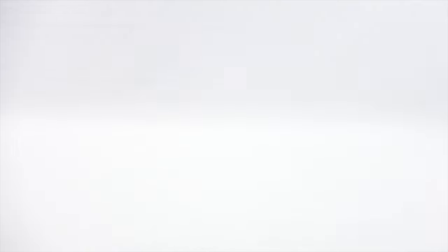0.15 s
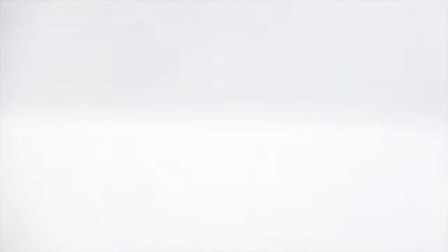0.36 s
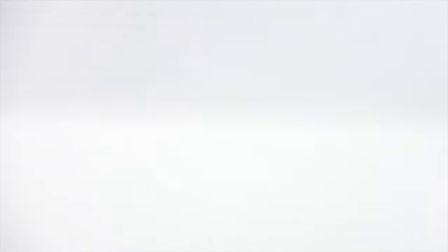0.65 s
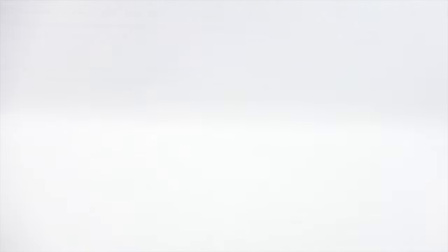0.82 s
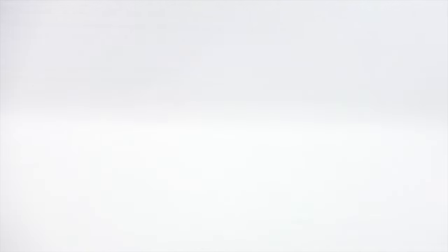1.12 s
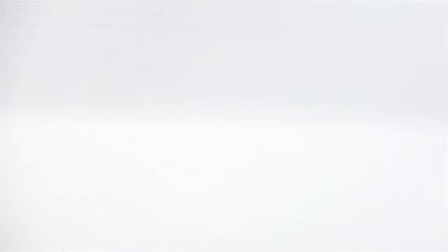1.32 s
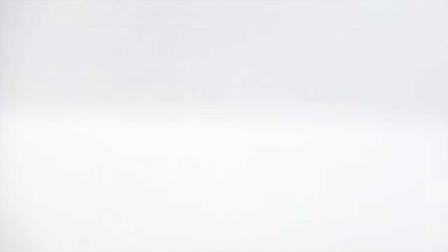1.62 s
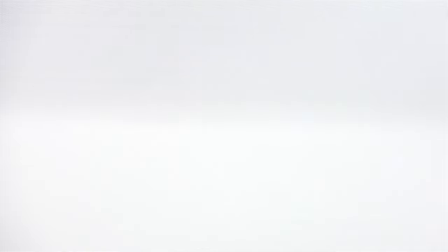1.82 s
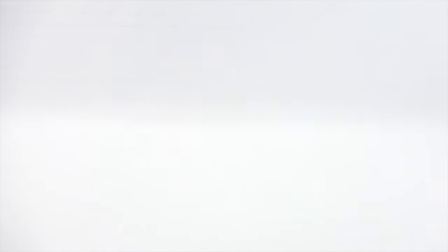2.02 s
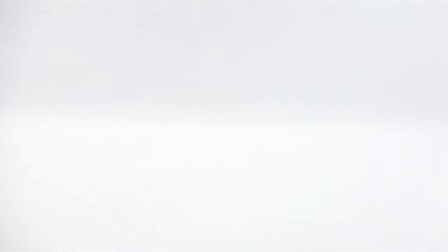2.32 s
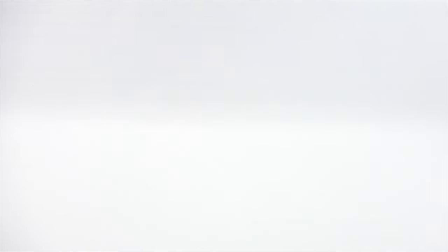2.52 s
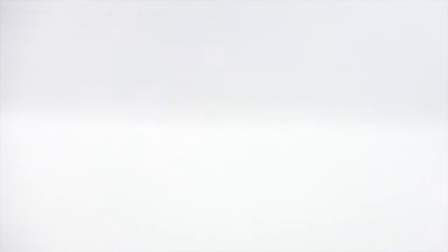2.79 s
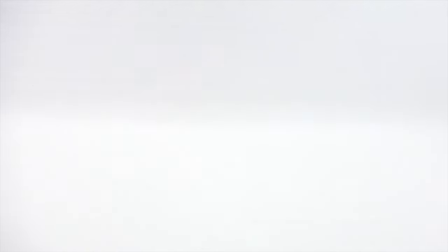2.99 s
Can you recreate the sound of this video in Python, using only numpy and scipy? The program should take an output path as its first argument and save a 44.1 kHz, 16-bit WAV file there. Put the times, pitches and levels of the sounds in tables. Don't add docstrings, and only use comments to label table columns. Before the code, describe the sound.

Steady rattling whir of a toy bird's motor and gears, briefly dipping at many wing beats, with soft low air puffs between slaps; close stereo pickup indoors, the toy drifting from near centre to the right.

```python
import sys
import numpy as np
from scipy import signal
from scipy.fft import rfft, irfft
from scipy.io import wavfile

SR = 44100
rng = np.random.default_rng(int(sys.argv[2]) if len(sys.argv) > 2 else 0)


def file_out(sig):
    cols = np.atleast_2d(sig).T
    lim = np.clip(cols, -1, 1)
    pcm = np.round(lim * 32767).astype(np.int16)
    wavfile.write(sys.argv[1], SR, pcm)


def elevation(decibels):
    levels = np.asarray(decibels, float)
    return 10 ** (levels / 20)


N = 138915
T = np.arange(N) / SR
CRANK_S, CRANK_START_S = 0.1873, 0.066
SUB_HZ, SUB_S, SUB_DB = 44, 0.0078, -9.5


def rms_one(x):
    return x / np.sqrt(np.mean(x ** 2) + 1e-20)


def at_hz(points, hz):
    table = np.array(points)
    return np.interp(np.log(hz), np.log(table[:, 0]), table[:, 1])


def drift(rate_hz):
    r = np.exp(-40 * np.pi * rate_hz / SR)
    slow = signal.lfilter([1], [1, -2 * r, r * r], rng.standard_normal(N // 20 + 2002))[2000:]
    return np.interp(np.arange(N) / 20, np.arange(len(slow)), rms_one(slow))


def bump(s, before_s, after_s):
    d = T - s
    width = np.where(d < 0, abs(before_s) + 1e-4, abs(after_s) + 1e-4)
    return np.exp(-0.5 * (d / width) ** 2)


def push(s, hz, width_s, phase):
    return bump(s, width_s, width_s * 1.31) * np.cos(2 * np.pi * hz * (T - s) + phase)


def sides(pan_db):
    return elevation(np.array([pan_db / 2, -pan_db / 2]))


def spread(mid, side, alike):
    return np.sqrt(1 + alike) * mid + np.sqrt(1 - alike) * side * [[1], [-1]]


def split(low_hz, top_hz, count):
    centres = np.geomspace(low_hz, top_hz, count)
    log_hz = np.log(np.fft.rfftfreq(N, 1 / SR) + 1)
    return [(c, np.interp(log_hz, np.log(centres), np.arange(count) == k)) for k, c in enumerate(centres)]


# share of turn, level/dB
LOAD_CYCLE = [
    (0, -2.5),
    (.1, -1),
    (.3, -1),
    (.48, -0.15),
    (.8, -0.3),
    (.95, -0.28),
    (1, -2.5),
]


def crank_load():
    return np.interp((T - CRANK_START_S) / CRANK_S % 1, *np.transpose(LOAD_CYCLE))


def rotation():
    motor_hz = 158 * (1 + 0.0278 * drift(5.28))
    wheel_db = 0.6 * np.cos(2 * np.pi * 28.5 * T)
    return wheel_db + 2 * np.cos(2 * np.pi * np.cumsum(motor_hz) / SR)


def jolts():
    jolts_per_s, decay_s = 170, 0.004
    starts = rng.exponential(1, N) * (rng.random(N) < jolts_per_s / SR)
    level = np.log(1 + signal.lfilter([1], [1, -np.exp(-1 / (decay_s * SR))], starts))
    return (level - level.mean()) / level.std()


# t/s, peak level/dB, decay/s
RATTLE_FITS = [(0.0388, -11, 0.0044), (0.1396, -18, 0.004), (0.161, -15, 0.0037), (0.169, -7, 0.0042),
               (0.2249, -12, 0.004), (0.27, -8, 0.004), (0.3047, -10, 0.0047), (0.311, -3, 0.0026),
               (0.3301, -12, 0.0032), (0.39, -5, 0.004), (0.4244, -13, 0.004), (0.4324, -8, 0.004),
               (0.473, -5, 0.0031), (0.4948, -9, 0.0037), (0.572, -9, 0.004), (0.644, -9, 0.0031),
               (0.6719, -7, 0.0047), (0.679, -14, 0.003), (0.7046, -9, 0.0043), (0.7437, -18, 0.0029),
               (0.8847, -16, 0.004), (0.9143, -20, 0.0033), (1.043, -7, 0.0047), (1.0774, -11, 0.004),
               (1.2092, -15, 0.004), (1.342, -8, 0.003), (1.3894, -8, 0.0032), (1.4127, -7, 0.004),
               (1.4491, -11, 0.0028), (1.515, -12, 0.004), (1.5429, -11, 0.0036), (1.6207, -15, 0.003),
               (1.6565, -11.5, 0.0028), (1.76, -2, 0.0046), (1.793, -9, 0.012), (1.912, -8, 0.004),
               (1.922, -12, 0.0034), (1.9619, -6, 0.0036), (1.993, -9, 0.004), (2.0168, -13, 0.004),
               (2.108, -12, 0.0045), (2.1914, -13, 0.0032), (2.2897, -10.5, 0.0032), (2.3291, -18, 0.0032),
               (2.3544, -6, 0.0047), (2.3644, 2, 0.003), (2.567, -7.5, 0.0051), (2.7, -7, 0.0034),
               (2.723, -6, 0.0036), (2.758, -9, 0.0043), (2.8215, -15, 0.004), (2.93, -4, 0.0032),
               (2.9642, -11, 0.0025), (3.0284, -9, 0.0028), (3.1043, -6, 0.0037), (3.1173, -8, 0.0043)]


def rattle_fits():
    return sum((db + 15) * bump(s + 0.00053, 0.0002, decay_s) for s, db, decay_s in RATTLE_FITS)


# t/s, level over the chatter/dB
TOOTH_KNOCKS = [(0.0647, 23), (0.104, 9), (0.1392, 20), (0.341, 7), (0.474, 18), (0.497, 6), (0.5725, 15),
                (0.647, 11), (0.809, 20), (0.886, 11), (0.979, 7), (1.056, 11), (1.087, 16), (1.171, 11),
                (1.1814, 9),  (1.428, 23), (1.546, 2), (1.626, 10), (1.724, 22), (1.924, 4), (2.018, 12),
                (2.03, 14), (2.12, 22), (2.193, 8), (2.228, 16), (2.292, 5), (2.6, 18), (2.663, 19),
                (2.866, 14), (2.936, 15), (2.941, 2), (2.973, 11), (3.004, 12), (3.032, 7), (3.038, 13),
                (3.12, 20)]


def knocks():
    knock_s = 0.0011
    return 0.45 * sum(db * bump(s, knock_s * 0.28, knock_s) for s, db in TOOTH_KNOCKS)


def mesh():
    teeth_per_s, size_spread_db, hiss_share, knock_size = 4500, 3.5, 0.48, 6.6
    sizes = elevation(size_spread_db * np.minimum(rng.exponential(1, N), 2.6)) * rng.choice([-1, 1], N)
    teeth = rms_one(sizes * (rng.random(N) < teeth_per_s / SR))
    places = [int(s * SR) for s, db in TOOTH_KNOCKS]
    teeth[places] = knock_size * rng.choice([-1, 1], len(places))
    shared = np.sqrt(1 - hiss_share) * teeth + np.sqrt(hiss_share) * rng.standard_normal(N)
    return np.array([shared, rng.standard_normal(N)])


# t/s, depth/dB, fall/s, rise/s
BACKLASH_LULLS = [(0.124, -12.5, 0.017, 0.044), (0.293, -10.5, 0.014, 0.0059), (0.495, -24, 0.017, 0.002),
                  (0.585, -18.5, 0.015, 0.0091), (0.667, -51, 0.0087, 0.0036), (0.821, -7.5, 0.0028, 0.027),
                  (0.859, -13, 0.0029, 0.0043), (1.033, -12, 0.02, 0.038), (1.385, -3.5, 0.042, 0.0018),
                  (1.439, -15, 0.0076, 0.0048), (1.566, -3, 0.0056, 0.023), (1.611, -14, 0.0061, 0.005),
                  (1.786, -48, 0.0067, 0.0037), (1.975, -10, 0.01, 0.043), (2.144, -4.5, 0.022, 0.0044),
                  (2.186, -20, 0.011, 0.0035), (2.375, -15, 0.012, 0.0045), (2.549, -16, 0.0067, 0.003),
                  (2.692, -3, 0.0023, 0.0052), (2.718, -13, 0.0077, 0.0043), (2.928, -26.5, 0.0075, 0.0039),
                  (3.066, -2, 0.0031, 0.0013), (3.091, -7, 0.011, 0.012), (3.133, -15, 0.0097, 0.0019)]


def backlash():
    floor_db = 37
    lull_db = sum(db * bump(s, fall_s, rise_s * 0.5) for s, db, fall_s, rise_s in BACKLASH_LULLS)
    return floor_db * np.tanh(lull_db / floor_db)


# f/Hz, width/Hz, first lift/dB, last lift/dB
SHELL_MODES = [(1222, 67, 6, 5.5), (1742, 130, 5, 4.5), (2238, 330, 6.5, 6.5), (2910, 170, 4.5, 2.5),
               (3560, 255, 9, 1.5), (4310, 235, 9.5, 2.5), (5540, 530, 3.5, 4.5), (6154, 290, 6.5, 6),
               (6990, 340, 2, 5.5), (8140, 990, 3.5, 2.5), (12420, 1350, 7.5, 10)]


def shell_modes(x):
    for hz, width_hz, first_db, last_db in SHELL_MODES:
        r = np.exp(-np.pi * width_hz / SR)
        zeros = np.array([1, 0, -1]) * (1 - r * r) / 2
        peak = signal.lfilter(zeros, [1, -2 * r * np.cos(2 * np.pi * hz / SR), r * r], x)
        lift_db = np.linspace(first_db, last_db, N) + 1.5 * drift(55)
        x = x + (elevation(lift_db) - 1) * peak
    return x


# t/s, left minus right level/dB, brightness level/dB, body level/dB
TOY_PLACE = [
    (0.0, -2.5, -2, -0.5),
    (0.15, -3, -2.4, -2),
    (0.7, -4.5, -0.3, 1.2),
    (1.2, -6.5, 0, 1.5),
    (3.15, -7, -0.5, 2.8),
]
# f/Hz, spectral level/dB per Hz
SHELL_COLOUR = [(290, -41), (500, -17.5), (860, -14), (1120, -3.5), (3200, -1.5), (5470, 0.5), (7640, -12),
                (12700, -21), (16000, -19)]
# f/Hz, left minus right level/dB
SHELL_LEAN = [(500, 3), (1300, 3.5), (2400, -1.36), (8000, 0), (15000, 1.5)]
# f/Hz, share
SHELL_LIKENESS = [(6000, .997), (8500, .58), (11000, .96)]


def gears():
    pan_db, bright_db, body_db = [np.interp(T, TIMES, c) for TIMES, c in
                                  [(np.transpose(TOY_PLACE)[0], c) for c in np.transpose(TOY_PLACE)[1:]]]
    load_db, lull_db, knock_db = crank_load(), backlash(), knocks()
    turn_db = rotation() + 2.68 * jolts() + rattle_fits()
    source = mesh()
    colour = elevation(at_hz(SHELL_COLOUR, np.fft.rfftfreq(N, 1 / SR) + 1))
    ceiling_db = 25.5
    out = 0
    for hz, weight in split(637, 16100, count=12):
        high = np.clip(np.log2(hz / 1000) / 3.5, 0, 1)
        burst_db = (0.45 + 0.37 * high ** 2) * turn_db + (0.46 + 0.85 * high) * knock_db
        level_db = (0.83 + 6.5 * 0.6 * high) * load_db + (0.3748 + 0.088 * high) * lull_db
        level_db = level_db + ceiling_db * np.tanh(burst_db / ceiling_db) + 2.4 * drift(75)
        level_db = level_db + high * bright_db + (hz < 2300) * body_db
        mid, side = irfft(rfft(source * elevation(level_db)) * weight * colour, N)
        pair = spread(mid, side, at_hz(SHELL_LIKENESS, hz))
        out = out + pair * sides(pan_db + at_hz(SHELL_LEAN, hz))
    return elevation(-20.5) * rms_one(shell_modes(out))


# f/Hz, spectral level/dB per Hz
AIR_COLOUR = [(13, -39), (22, -61), (60, 3), (92, 5.5), (190, 4), (387, -10), (700, -89), (910, -43),
              (1540, -120)]


def air():
    peak_turn, quiet_turn = 0.1, 0.3
    white = rng.standard_normal((2, 2, N))
    turn = 2 * np.pi * (T - CRANK_START_S) / CRANK_S
    swell_db = 5 * np.cos(2 * turn - 4 * np.pi * peak_turn) - 5.5 * np.cos(turn - 2 * np.pi * quiet_turn)
    swell_db = swell_db + 3 * drift(4.5)
    edges = 23.04 * 2 ** (np.arange(15) / 3)
    out = 0
    for k, (low, high) in enumerate(zip(edges, edges[1:])):
        sos = signal.butter(2, [low, high], "band", fs=SR, output="sos")
        mid, side = signal.sosfilt(sos, white[k % 2])
        out = out + elevation(at_hz(AIR_COLOUR, np.sqrt(low * high)) + swell_db) * spread(mid, side, 0.89)
    return elevation(-44) * rms_one(out)


# t/s, peak level/dB, f/Hz
UPSTROKE_PUFFS = [(0.004, -32, 94), (0.354, -31, 113), (0.375, -28, 125), (0.401, -36, 133),
                  (0.55, -42, 80), (0.727, -34, 94), (0.746, -47, 117), (0.879, -33, 90), (0.929, -27, 92),
                  (0.954, -28, 137), (1.075, -37, 80), (1.119, -30, 112), (1.169, -38, 158),
                  (1.298, -27, 92), (1.333, -30, 169), (1.492, -27.5, 103), (1.663, -31.5, 132),
                  (1.7, -29, 96), (1.813, -37, 101), (1.874, -25, 164), (1.893, -29.5, 101),
                  (2.03, -47, 80), (2.064, -31, 173), (2.239, -27.5, 88), (2.271, -36, 148),
                  (2.43, -30.5, 106), (2.608, -30.5, 93), (2.637, -33, 157), (2.814, -29, 158),
                  (2.851, -34, 136), (2.978, -37, 149), (3.017, -27, 164)]


def puffs():
    out = np.zeros((2, N))
    phases = rng.uniform(0, 2 * np.pi, len(UPSTROKE_PUFFS))
    for (s, db, hz), phase in zip(UPSTROKE_PUFFS, phases):
        puff = push(s, hz, 0.0043 * (110 / hz) ** 0.6, phase)
        puff = puff + elevation(SUB_DB) * push(s, SUB_HZ, SUB_S, phase)
        out += elevation(db) * puff * sides(-(hz - 110) * 0.053 * s)[:, None]
    return out


def room(x):
    t60_s = 0.11
    t = np.arange(int(0.3 * SR)) / SR
    tail = rng.standard_normal(len(t)) * elevation(-60 * t / t60_s) * (t > 0.004)
    tail = tail / np.sqrt(np.sum(tail ** 2))
    return elevation(-17) * signal.fftconvolve(x, tail[None], axes=1)[:, :N]


# t/s, peak level/dB, flex against it level/dB
WING_SLAPS = [(0.078, -50, -2), (0.258, -25.5, -4), (0.46, -27, -17), (0.636, -26.5, 2), (0.829, -39, -15),
              (1.007, -28, -3), (1.199, -34, -11), (1.381, -20.5, -1), (1.574, -33, -1.5),
              (1.755, -39.5, 9), (1.947, -35.5, 0), (2.139, -26.5, -9), (2.318, -22, -0.5),
              (2.515, -30.5, -1), (2.69, -23, -4.5), (2.887, -30.5, 1), (3.067, -20, -2)]


def slaps():
    out = np.zeros((2, N))
    for s, db, flex_db in WING_SLAPS:
        low = push(s, 94 * (1 + 0.078 * rng.normal()), 0.005, 1.4)
        low = low + elevation(SUB_DB) * push(s + 0.011, SUB_HZ, SUB_S, 0.2)
        flex = elevation(-1.5 + flex_db) * push(s - 0.0055 + 0.0012 * s, 245, 0.002, 1.85)
        out += elevation(db) * (low + flex * sides(-3 - 3 * s)[:, None])
    return out


# t/s, peak level/dB
FILM_SNAPS = [(0.251, -32), (0.457, -42), (0.635, -31), (0.807, -43), (1.011, -33.5), (1.199, -36.5),
              (1.374, -25.5), (1.568, -38), (1.75, -32.5), (1.922, -38), (1.943, -36), (2.057, -45),
              (2.137, -26.5), (2.321, -26), (2.509, -33), (2.693, -27.5), (2.792, -42), (2.882, -28),
              (3.07, -21)]


def snaps():
    out = np.zeros((2, N))
    for s, db in FILM_SNAPS:
        snap = push(s + 0.0016, 490 * (0.65 + 0.11 * s), 0.00022 * (2.1 - 0.43 * s), 1.0)
        out += elevation(db + 8.5) * snap * sides(-2.2 - 1.7 * s)[:, None]
    return out


def scene():
    toy = gears()
    return toy + air() + puffs() + room(toy) + slaps() + snaps()


def roll_off(x):
    return signal.sosfilt(signal.butter(12, 16440, fs=SR, output="sos"), x)


def record(dry):
    limit = 0.52
    dry = signal.sosfilt(signal.butter(2, 36, "high", fs=SR, output="sos"), dry)
    rounded = limit * np.tanh(dry / limit)
    mix = signal.sosfilt(signal.ellip(10, 0.5, 50, 15820, fs=SR, output="sos"), rounded)
    return roll_off(mix)


dry = scene()
out = record(dry)
file_out(out)
```